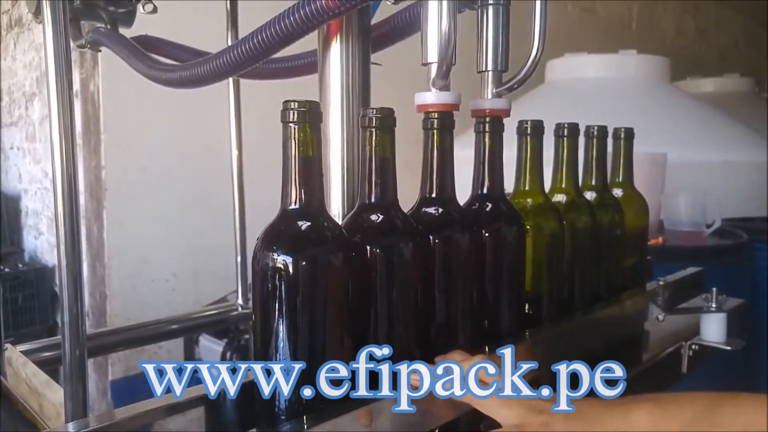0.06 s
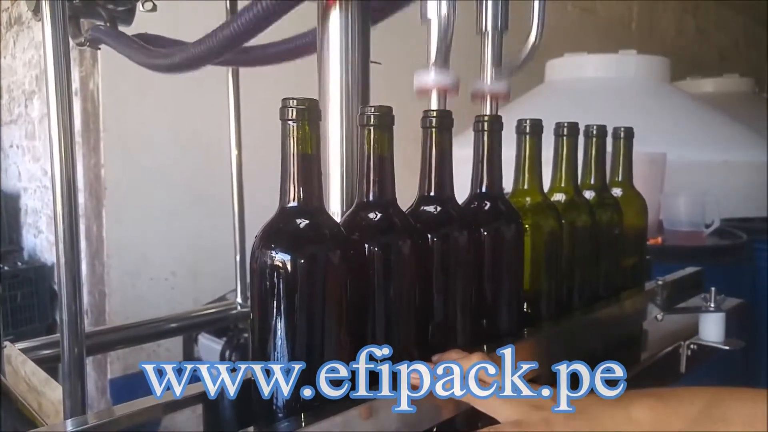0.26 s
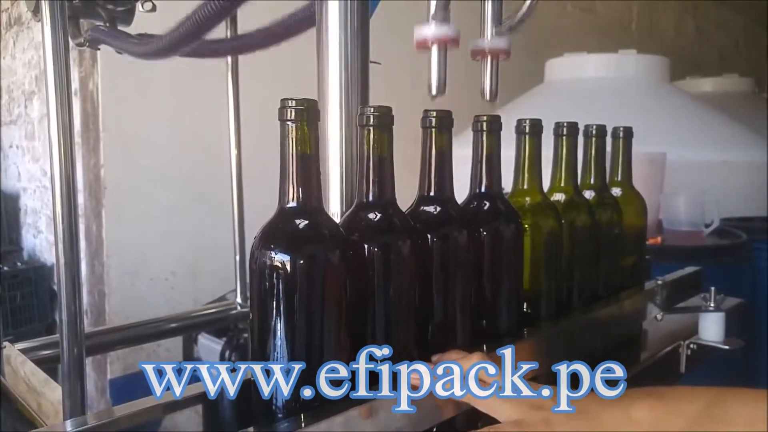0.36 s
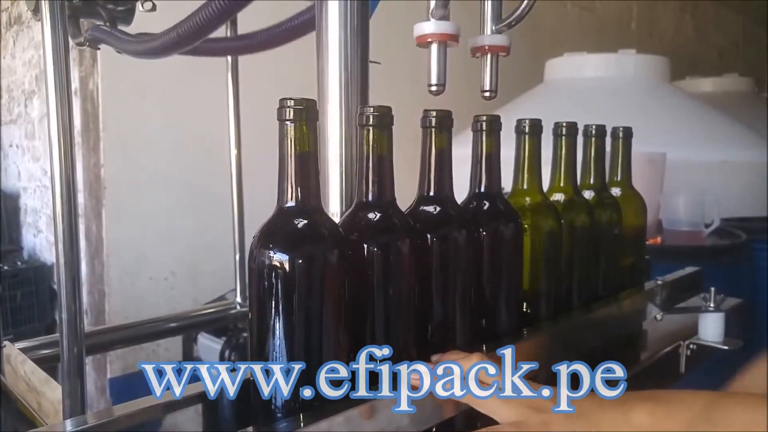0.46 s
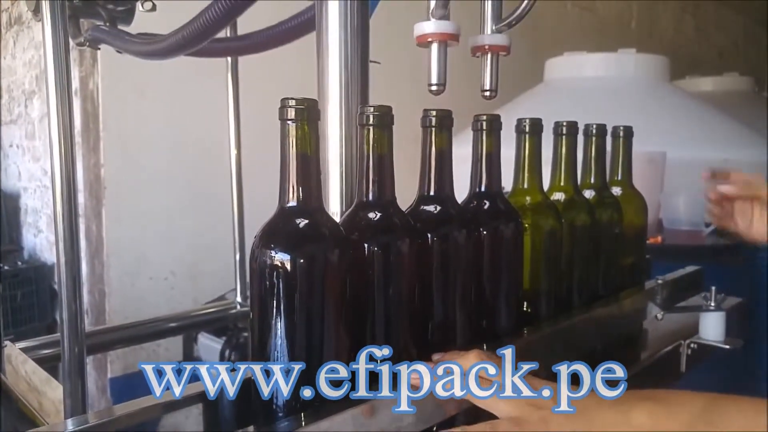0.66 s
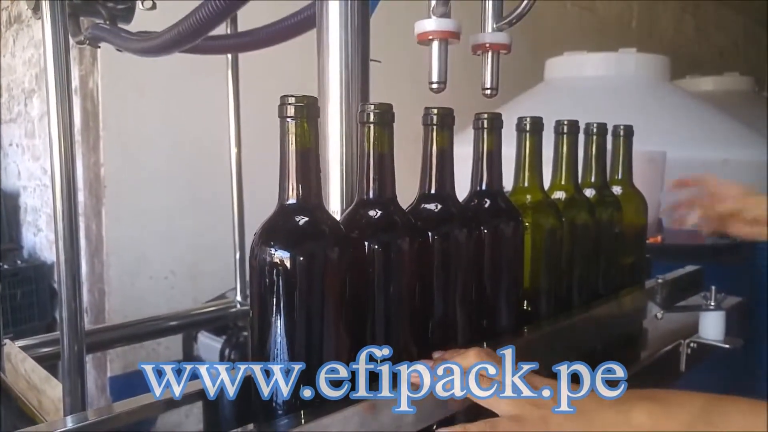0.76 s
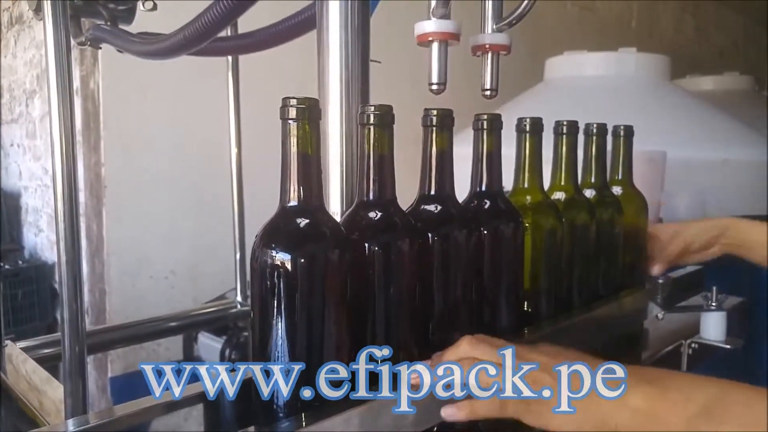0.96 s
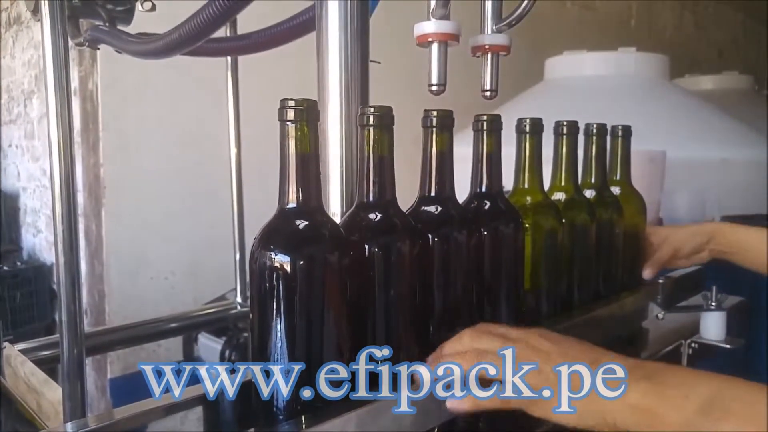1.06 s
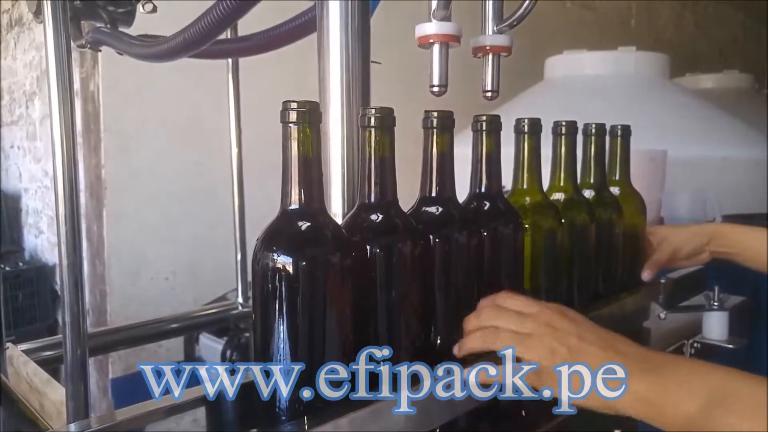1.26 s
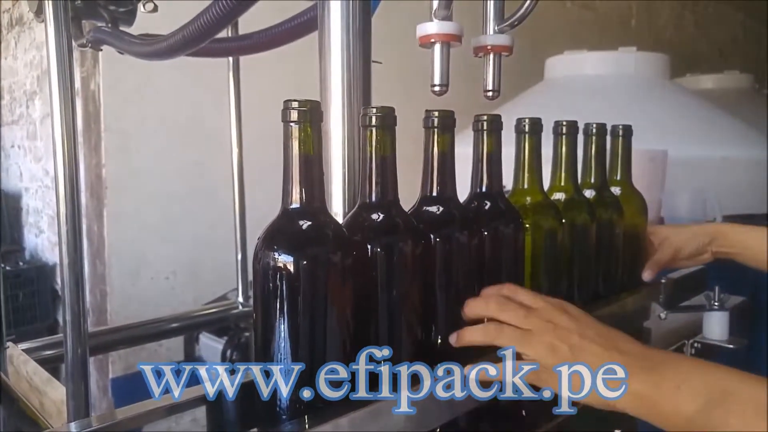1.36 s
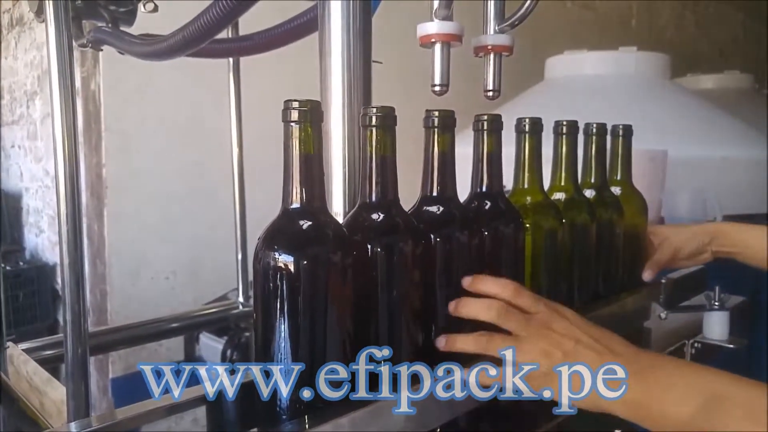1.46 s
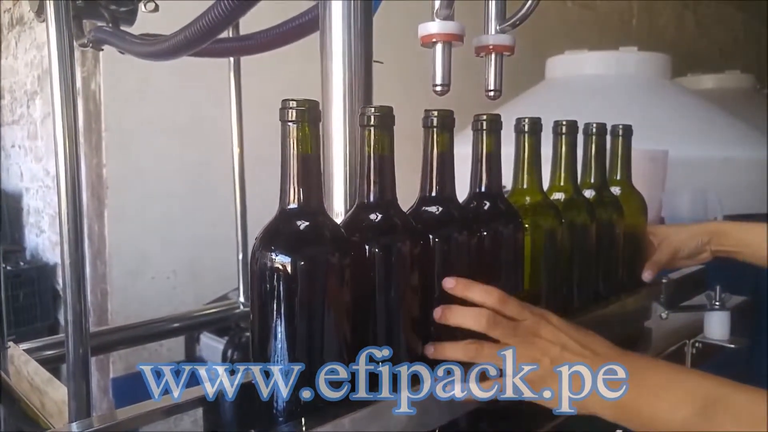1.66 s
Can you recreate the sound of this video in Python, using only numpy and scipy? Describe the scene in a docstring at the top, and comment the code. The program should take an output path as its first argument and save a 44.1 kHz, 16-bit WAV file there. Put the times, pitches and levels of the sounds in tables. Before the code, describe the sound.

A pneumatic bottle filler spits sharp bursts of air at 0.1 and 0.2 seconds. Its head leaves the bottle necks with a soft pop, and a whistling hiss runs until a metal clunk at 0.5. Glass bottles clink and briefly scrape from 0.7 to 1.2. A steel part then clanks and rattles until about 1.3. Faint hum and one light knock near 1.7 follow, with short workshop echo.

```python
"""First a valve spits air: a pneumatic bottle filler is at work in a hard-walled workshop. Its cylinder
vents with a whistling hiss, and the filling head pops off the bottle necks and clunks against its top
stop. Wine bottles then clink together, and a metal part clanks and rattles. Room noise lies underneath,
with a faint hum near the end. Air is shaped noise; struck glass and metal add fading tones (modes)."""
import sys
import numpy as np
from scipy import signal
from scipy.fft import rfft, irfft, next_fast_len
from scipy.io import wavfile

SR = 44100
rng = np.random.default_rng(int(sys.argv[2]) if len(sys.argv) > 2 else 0)


def inscribe(sig):
    """Save sig as 16-bit PCM at rate SR to the path in sys.argv[1].

    A 1-D sig is mono; a 2-D sig holds one channel per row.
    Samples are clipped to [-1, 1] before scaling.
    """
    pcm = np.round(np.clip(np.atleast_2d(sig).T, -1, 1) * 32767)
    wavfile.write(sys.argv[1], SR, pcm.astype(np.int16))


N = 74970


def amp(db):
    """Turn decibels into a gain."""
    return 10 ** (np.asarray(db) / 20)


def unit(x):
    """Scale to an average (rms) level of 1."""
    return x / np.sqrt(np.mean(x ** 2) + 1e-20)


def clock():
    """Each sample's time in seconds."""
    return np.arange(N) / SR


def along(points, hz):
    """Read between (f/Hz, value) points on a log axis."""
    f, v = np.transpose(points)
    return np.interp(np.log(hz + 1), np.log(f + 1), v)


def level(points):
    """Gain per sample from (t/s, level/dB) points."""
    return amp(np.interp(clock(), *np.transpose(points)))


def filtered(x, response):
    """Scale each frequency in x by response(hz)."""
    size = next_fast_len(N + SR // 2)
    return irfft(rfft(x, size) * response(np.fft.rfftfreq(size, 1 / SR)), size)[:N]


def octaves(hz):
    """Octaves above roughly 2 kHz."""
    return np.log2((hz + 50) / 2000)


def noise(colour, tilt=0):
    """Noise shaped by (f/Hz, level/dB) points; tilt brightens it, in dB per octave."""
    white = rng.standard_normal(N)
    return unit(filtered(white, lambda hz: amp(along(colour, hz) + tilt * octaves(hz))))


def resonant(peaks):
    """Noise that sings at (f/Hz, width/Hz, level/dB) peaks."""
    def response(f):
        return sum(amp(db) / (1 + ((f - hz) / (width / 2)) ** 2) for hz, width, db in peaks)
    return unit(filtered(rng.standard_normal(N), response))


def envelope(start, rise, hold, t60):
    """Rise, hold, then fade; t60 is the time to fade by 60 dB."""
    t = clock() - start
    return np.clip(t / max(rise, 1e-4), 0, 1) * amp(-60 * np.maximum(t - rise - hold, 0) / t60)


def ring(modes, start, tilt, wander, twin=0):
    """Fading tones of a struck part. Touching parts ring unsteadily: wander sets how much."""
    t = np.arange(3 * SR // 4) / SR
    steps = np.arange(0, t[-1], 0.005)
    twin_gap_hz, scatter_db = 20, 0.5
    tones = np.zeros(len(t))
    for hz, db, t60 in modes:
        chance = rng.standard_normal(len(steps) + 2)
        drift = wander * np.sqrt(hz / 2000) * np.cumsum(chance[2:])
        phase = 2 * np.pi * hz * t + np.interp(t, steps, np.pi * chance[1] + drift)
        pair = np.sin(phase) - twin * np.sin(phase + 2 * np.pi * twin_gap_hz * t)
        gain = amp(db + tilt * octaves(hz) + scatter_db * chance[0])
        tones += gain * amp(-60 * t / t60) * pair
    return np.pad(tones * np.clip(t / 0.001, 0, 1), (round(start * SR), N))[:N]


def blows(hits, colour, modes, t60):
    """Each blow on metal is a short, noisy clatter plus a few ringing tones."""
    sound = 0
    for start, db, tilt in hits:
        clatter = noise(colour, tilt) * envelope(start, 0.00077, 0, t60)
        sound += amp(db) * (clatter + ring(modes, start, tilt, wander=0.62))
    return sound


def room(x, wet_db):
    """Add the echo of the hard walls, whose treble dies before its middle range."""
    fade_times = [(100, 0.35), (300, 0.84), (800, 0.62), (2000, 0.77), (6000, 0.46), (10000, 0.49),
                  (16000, 0.48)]  # echo length: f/Hz, t60/s
    hz, t, spectrum = signal.stft(rng.standard_normal(SR), SR, nperseg=256)
    fade = amp(-60 * t / along(fade_times, hz)[:, None])
    tail = signal.istft(spectrum * fade, SR, nperseg=256)[1]
    tail = np.pad(tail / np.linalg.norm(tail), (SR // 250, 0))  # arrives 4 ms late
    return x + amp(wet_db) * signal.fftconvolve(x, tail)[:N]


def background():
    """Room noise and a wavering low hum."""
    colour = [(25, -9), (150, 2), (480, -2), (750, -2.5), (3500, -14), (8500, -12.5), (15800, -41)]  # room noise: f/Hz, level/dB
    swell = [(1.3, -88), (1.47, -77.5), (1.7, -77.5)]  # hum: t/s, level/dB
    return amp(-75.5) * noise(colour) + level(swell) * resonant([(76.5, 14, 0)])


def sliding_ram():
    """The ram, the rod that lifts the head, sings as it slides."""
    note = [(800, 8, 0)]  # its resonance: f/Hz, width/Hz, level/dB
    loudness = [(.2, -105), (.37, -88), (.42, -61), (.49, -75.5), (.63, -60), (.9, -125)]  # its swell: t/s, level/dB
    return resonant(note) * level(loudness)


def head_knocks():
    """The valve ticks once, then the filling head knocks and hits its top stop, and the frame rings."""
    hits = [(.109, -63, 2), (.333, -53, -2.5), (.346, -56, 5), (.5165, -43, -3), (.524, -46, 6),
            (.551, -45, 2.5), (1.657, -64.5, -6)]  # knocks: t/s, level/dB, tilt/(dB per octave)
    colour = [(60, -55), (170, -8.5), (450, 0), (750, 5.5), (1100, 3), (2100, 0.5), (2800, -12.5),
              (6500, -14), (9000, -20), (14000, -55)]  # clatter: f/Hz, level/dB
    modes = [(159, -39, 0.26), (584, -25, 0.61), (767, -22.5, 0.4), (850, -21, 0.23), (1680, -10.5, 0.18)]  # frame tones: f/Hz, level/dB, t60/s
    return room(blows(hits, colour, modes, t60=0.15), wet_db=-3.5)


def metal_clank():
    """A steel part clanks, then rattles with weaker blows."""
    hits = [(1.225, -40.5, 2), (1.249, -41.5, 2.5), (1.264, -43, -1), (1.285, -44.5, -0.5)]  # blows: t/s, level/dB, tilt/(dB per octave)
    colour = [(200, -43), (330, -7.5), (600, -1), (1500, -4), (2200, -2), (2600, -13), (4500, -23.5),
              (5300, -9), (6600, -16), (7500, -20.5), (9500, -17), (10500, -29), (15800, -39.5)]  # clatter: f/Hz, level/dB
    modes = [(609, -11.5, 0.41), (785, -23.5, 1), (1620, -15, 0.3), (2210, -6.5, 0.11), (3016, -18.5, 0.2),
             (5180, -8.5, 0.034), (6486, 1, 0.054), (8130, -17, 0.31), (9560, -12, 0.045)]  # steel tones: f/Hz, level/dB, t60/s
    return room(blows(hits, colour, modes, t60=0.18), wet_db=-3.5)


def bottles():
    """Two bottles ring at each contact, knock dully on the track and slide along it."""
    # contacts: t/s, first bottle/dB, second bottle/dB, base knock/dB, tilt/(dB per octave)
    clinks = [(0.67, -54, -65.5, -51.5, 1), (0.833, -62.5, -68, -64, -1), (0.898, -56, -50, -48, 1),
              (0.973, -66.5, -55.5, -55, -3.5), (1.125, -53.5, -50.5, -52.5, -5.5),
              (1.153, -52, -46, -53, -5.5), (1.167, -59, -62, -56.5, 0)]
    # each bottle's tones: f/Hz, level/dB, t60/s
    first = [(1973, 2.5, 0.56), (5160, -17, 0.81), (6428, -2.5, 0.16), (8160, -19.5, 0.29),
             (10050, -22, 0.67), (10540, -9, 0.12), (15000, -29, 0.16)]
    second = [(2666, -1.5, 0.39), (3510, -25, 0.24), (4350, -18, 0.37), (4610, -14, 0.43),
              (5020, -29, 0.32), (5570, -17.5, 0.56), (6000, -14, 0.17), (7520, -7, 0.15),
              (7340, -13.5, 0.33), (9080, -11.5, 0.26), (11560, -32, 0.46)]
    # glass sliding on steel: t/s, rise/s, hold/s, t60/s, level/dB, tilt/(dB per octave)
    scrapes = [(0.826, 0.013, 0.01, 0.18, -62.5, 2), (1.122, 0.048, 0.027, 0.2, -54.5, -2.5)]
    # noise of a scrape and of a base knock: f/Hz, level/dB
    scrape_colour = [(300, -19), (750, 15.5), (1300, -1.5), (2500, 9.5), (3700, -4), (5500, 4.5), (8000, 4),
                     (15000, -26)]
    base_colour = [(100, -47), (280, -9.5), (470, -23), (660, 1.5), (1050, -1), (1500, -9.5), (3000, -17.5)]
    # a crowd of weak, high glass tones
    shimmer = [(hz, -13.5 - 10.5 * np.log2(hz / 4980), 0.26) for hz in rng.uniform(4980, 16300, 30)]
    first_twin = amp(-3.5)  # this bottle is not quite round, so its lowest tone beats with a twin
    pings = overtones = 0
    for start, first_db, second_db, _, tilt in clinks:
        for modes, db, twin in ((first, first_db, first_twin), (list(second) + shimmer, second_db, 0)):
            pings += amp(db) * ring(modes[:1], start, tilt, wander=0.55, twin=twin)
            overtones += amp(db) * ring(modes[1:], start, tilt, wander=0.5)
    pings = room(pings, wet_db=-9)
    knocks = sum(amp(db) * noise(base_colour) * envelope(start, 0.0012, 0.0043, t60=0.021)
                 for start, _, _, db, _ in clinks)
    knocks = signal.sosfilt(signal.butter(4, 3500, "lowpass", fs=SR, output="sos"), knocks)
    slide = sum(amp(db) * noise(scrape_colour, tilt) * envelope(start, rise, hold, t60)
                for start, rise, hold, t60, db, tilt in scrapes)
    return pings + room(overtones, wet_db=-2) + room(knocks + slide, wet_db=-2.5)


def seal_pop():
    """The seals leave the bottle necks with a sinking thump and a puff."""
    colour = [(110, 4.5), (220, -8.5), (370, 1.5), (550, -10), (1100, -10.5), (2000, -46)]  # puff of air: f/Hz, level/dB
    start, pop_hz, glide_s = 0.2312, 51.4, 0.0025
    t = np.maximum(clock() - start, 0)
    cycles = pop_hz * (t + glide_s * (1 - np.exp(-t / glide_s)))  # starts an octave high
    thump = amp(-46.5) * envelope(start, 0.0032, 0, t60=0.085) * np.sin(2 * np.pi * cycles)
    puff = amp(-40) * noise(colour) * envelope(0.2255, 0.009, 0.0011, t60=0.03)
    return signal.sosfilt(signal.butter(3, 36, "highpass", fs=SR, output="sos"), thump + puff)


def cylinder_vent():
    """Air leaves the cylinder through a whistling port while the head rises."""
    flow = [(.2, -110), (.228, -51.5), (.265, -53.5), (.30, -56.5), (.35, -55), (.40, -60.5), (.46, -54.5),
            (.50, -65.5), (.7, -130)]  # escaping air: t/s, level/dB
    colour = [(150, -38), (400, -6), (800, -8), (1500, -8.5), (5300, -9.5), (8800, -3.5), (11000, -5.5),
              (13500, -11), (15800, -19)]  # its hiss: f/Hz, level/dB
    whistles = [(4480, 115, -1.5), (7000, 170, -2), (8330, 240, -7), (9100, 790, -3)]  # port resonances: f/Hz, width/Hz, level/dB
    exhaust = unit(noise(colour) + amp(-3.5) * resonant(whistles))
    return room(exhaust * level(flow), wet_db=-1.5)


def valve_spit():
    """Short jets of air hiss and whistle in the valve."""
    bursts = [(0.105, 0.016, 0.017, 0.031, -38), (0.199, 0.0074, 0.0059, 0.088, -43.5),
              (0.211, 0.011, 0.0086, 0.29, -36.5)]  # jets: t/s, rise/s, hold/s, t60/s, level/dB
    colour = [(400, -18), (1400, -29), (3100, -14), (5300, -18.5), (6800, -1.5), (7700, -10), (8500, 1),
              (10100, -4.5), (15800, -19)]  # their hiss: f/Hz, level/dB
    whistles = [(3166, 88, -18), (8320, 530, -3), (9360, 240, -5)]  # nozzle resonances: f/Hz, width/Hz, level/dB
    jet = unit(noise(colour) + amp(-2.5) * resonant(whistles))
    flow = sum(amp(db) * envelope(start, rise, hold, t60) for start, rise, hold, t60, db in bursts)
    leak = amp(-70.5 - 60 * clock() / 0.21)  # faint hiss dying away at the start
    return room(jet * (flow + leak), wet_db=-7)


def scene():
    """Mix all the sources into one channel."""
    metal = head_knocks() + metal_clank()
    filler = valve_spit() + cylinder_vent() + sliding_ram() + seal_pop()
    return (metal + filler + bottles() + background())[None]


def record(dry):
    """Round off the highest peaks and cut the very top of the treble."""
    ceiling, top_hz = amp(-29), 15900
    rounded = dry / (1 + (dry / ceiling) ** 6) ** (1 / 6)
    return np.array([filtered(x, lambda hz: hz < top_hz) for x in rounded])


dry = scene()
out = record(dry)
inscribe(out)
```